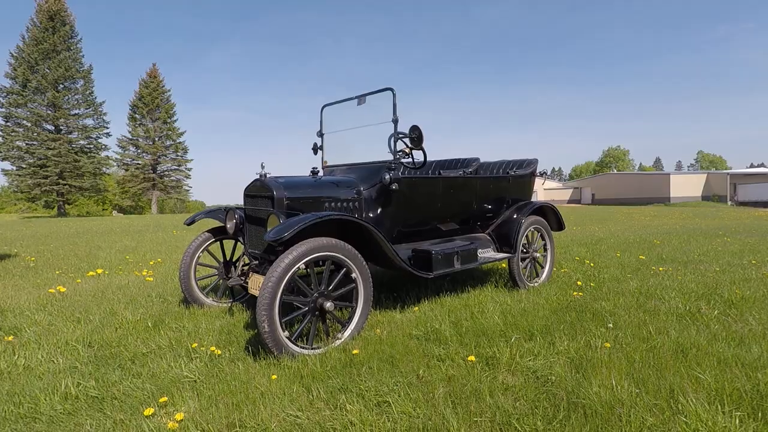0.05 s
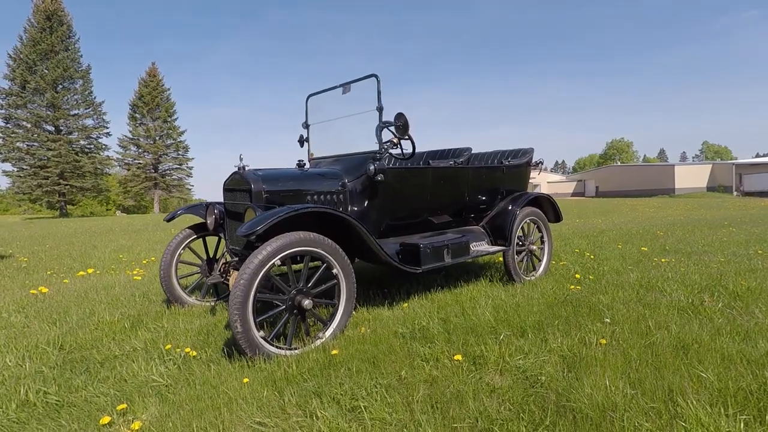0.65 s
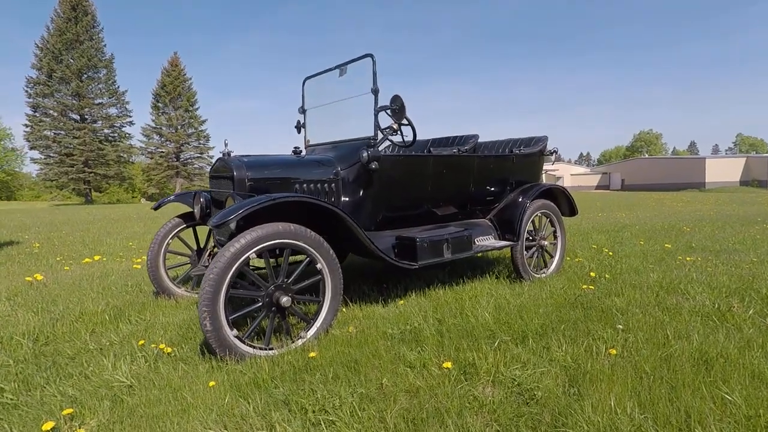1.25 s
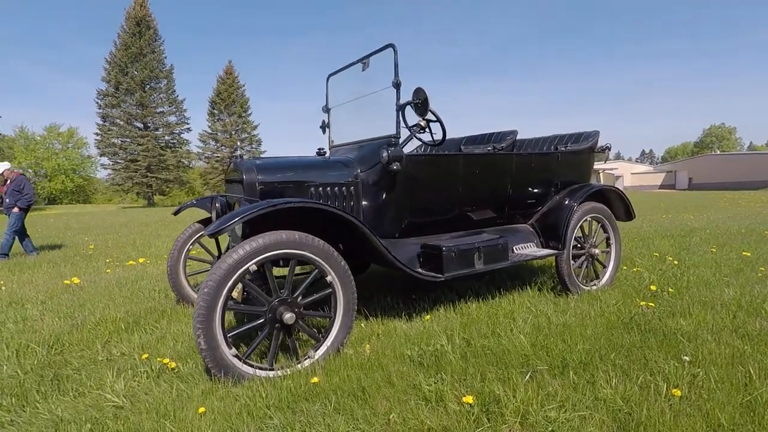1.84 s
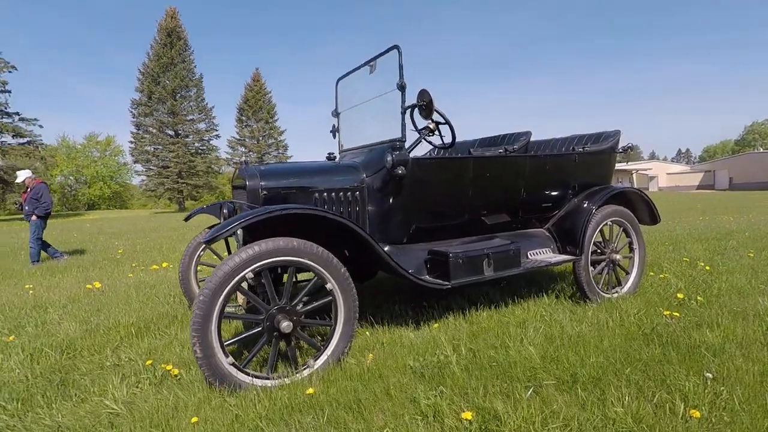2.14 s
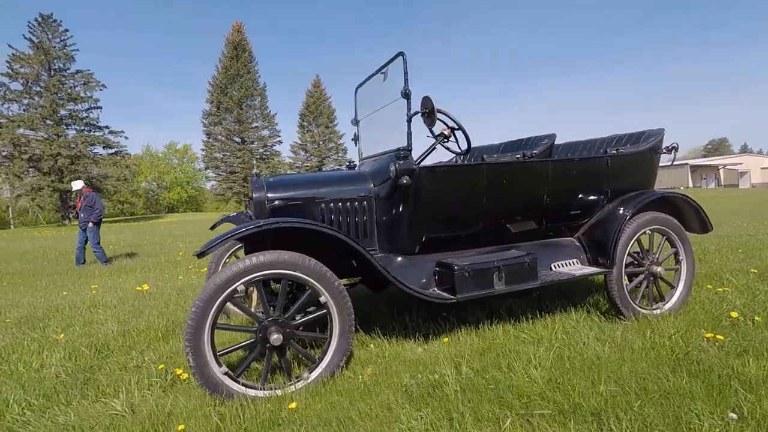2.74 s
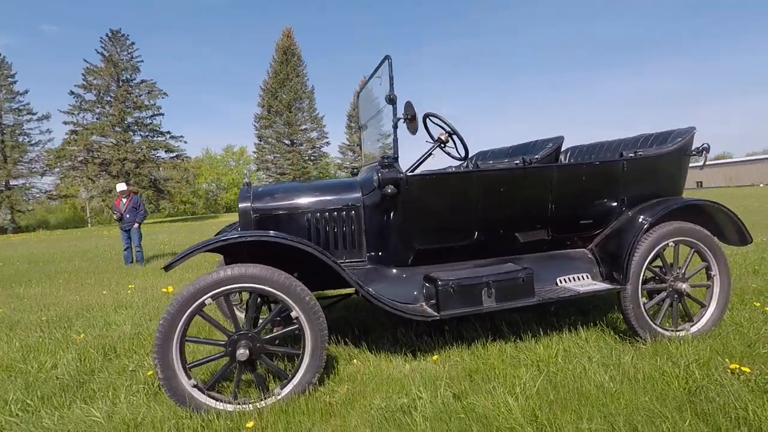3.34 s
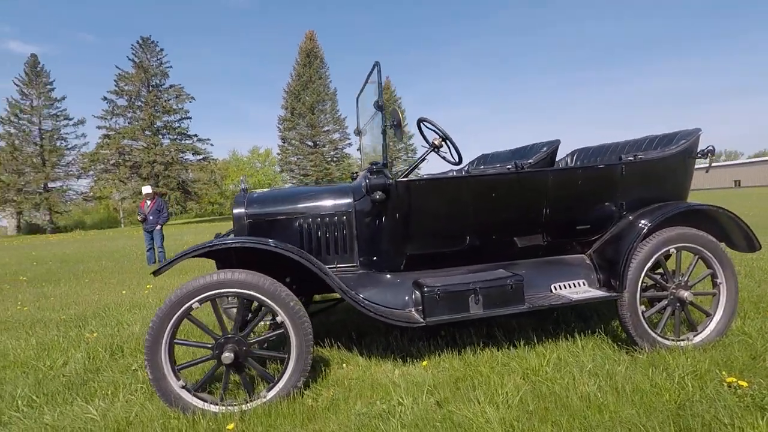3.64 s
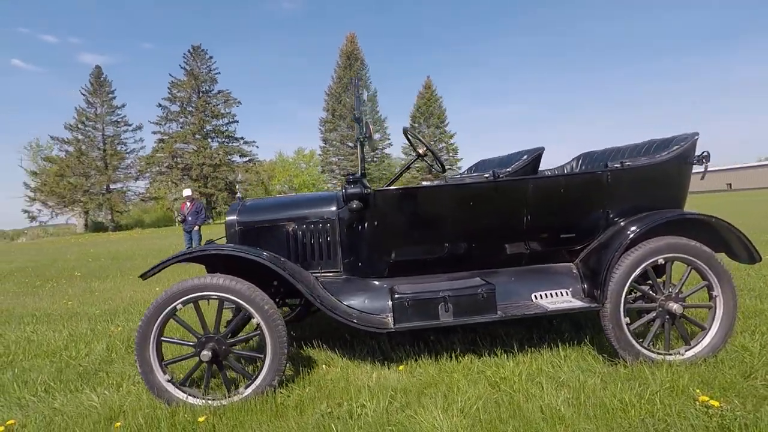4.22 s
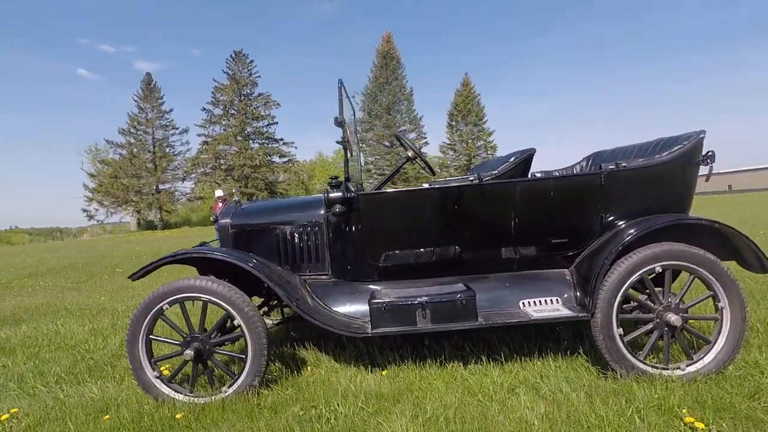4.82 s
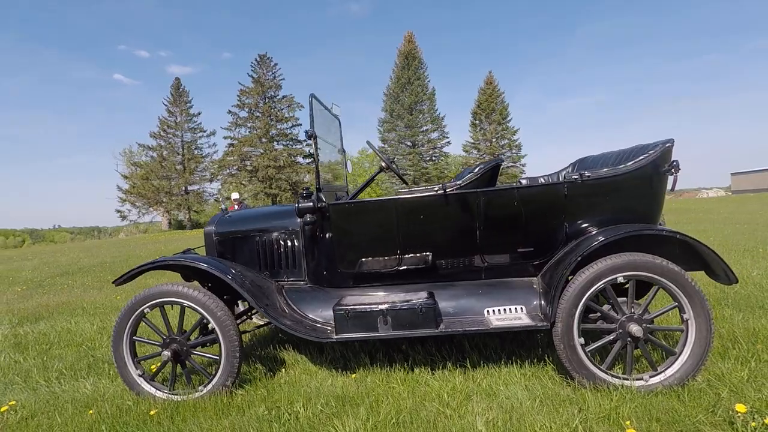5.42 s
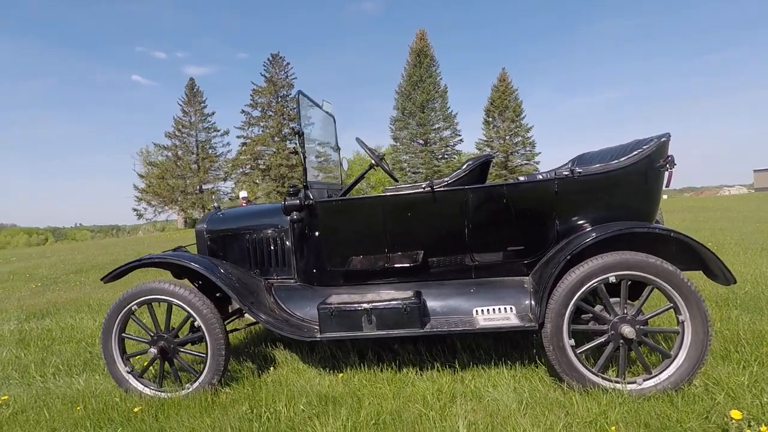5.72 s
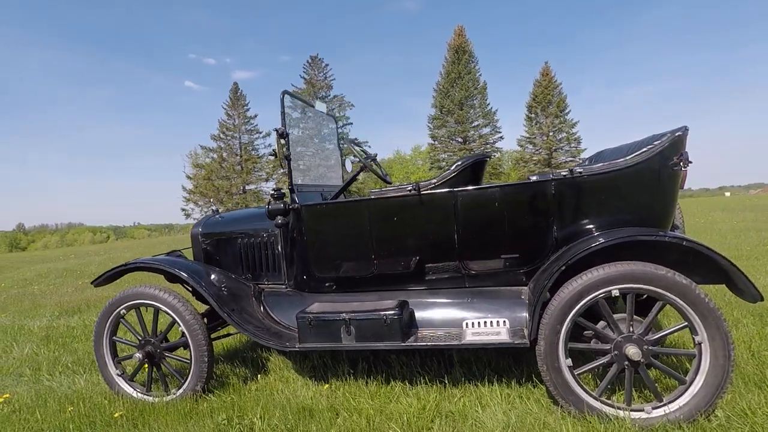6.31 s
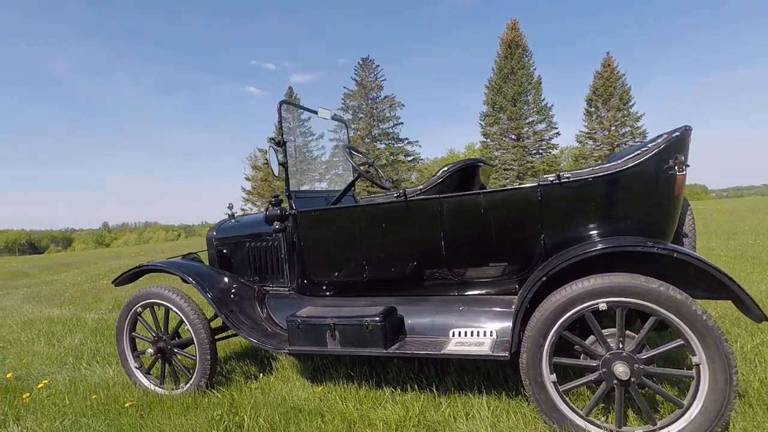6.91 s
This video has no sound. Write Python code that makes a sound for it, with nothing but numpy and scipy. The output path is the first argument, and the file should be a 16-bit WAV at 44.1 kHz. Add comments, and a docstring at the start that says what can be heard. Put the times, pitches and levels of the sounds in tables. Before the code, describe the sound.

Fast, deep chugging from an old four-cylinder car engine fades in and keeps going as the car stands outdoors. Over the throb come drumming body panels, chattering valves, light metal knocks and a buzzing tick with every pulse, along with a thin hiss. Heard from about three metres by a microphone carried around the car, the sound is clearest as it passes the hood, and the idle slows very slightly.

```python
"""Antique car idling on grass

A four-cylinder car in the open, about 3 m off, the microphone carried from its nose to its side.
The uneven exhaust chugs about 25 times a second and shakes the body; iron parts clatter and knock.
With every firing a burst of fizzing ticks, probably the ignition coils, comes from under the hood."""
import sys
import numpy as np
from scipy import signal
from scipy.fft import rfft, irfft
from scipy.io import wavfile

SR = 44100
rng = np.random.default_rng(int(sys.argv[2]) if len(sys.argv) > 2 else 0)


def dump(signal):
    """Clip the signal to [-1, 1] and save it as 16-bit WAV at the path in sys.argv[1]."""
    limited = np.clip(np.atleast_2d(signal).T, -1, 1)
    pcm = np.round(limited * 32767).astype(np.int16)
    wavfile.write(sys.argv[1], SR, pcm)


N = 311346
T = np.arange(N) / SR
IDLE_HZ, EXCESS_HZ, SETTLE_S = 23.93, 2.07, 7.3  # the firing rate starts fast and eases towards idle

# microphone's walk, 0 at the nose to 1 at the side: time_s, position
WALK = [(1.2, 0), (5.6, 1)]
# microphone closing in on the hood, then circling it: time_s, distance_m
HOOD_DISTANCE = [(0, 3.74), (2.1, 2.84), (4.6, 3), (7, 2.84)]
# the engine is most direct as the microphone passes the hood louvres: time_s, openness (0 to 1)
LOUVRES = [(0, 0), (3.7, 0.99), (7.06, 0.14)]
# the hood's sounds fall behind the chug as the tailpipe comes closer: time_s, lag_firings
HOOD_LAG = [(1, -.03), (3.5, .01), (7, .13)]
# throb of the rocking car: harmonic, crest_firings, nose_db, side_db
ROCKING = [(1, 0, -23.5, -18.9), (2, .24, -31.2, -24.2), (3, .12, -22.6, -25.4), (4, .12, -55, -36)]
# one exhaust puff per cylinder, unevenly spaced, the last one weak: place_firings, level_db
CYLINDERS = [(-.07, 4.2), (1.37, 3.9), (2.22, 7.2), (2.97, -7.4)]
# exhaust pipe resonances: pitch_hz, width_hz, nose_db, side_db
PIPE_MODES = [(72.8, 4.76, -39.5, -38.5), (113, 5, -65, -45), (125.9, 5.4, -43.5, -47),
              (142.8, 40.5, -52, -54.5)]
# spectrum of the turbulent gas: frequency_hz, level_db
RUMBLE_SPECTRUM = [(4, 8), (12, -31), (30, 5.5), (65, 5.5), (130, 6), (180, -7.5), (300, -24.5), (600, -54)]
# spectrum of the drumming body: frequency_hz, level_db
BODY_SPECTRUM = [(60, -34.5), (150, -6), (200, -3.5), (280, 1), (370, -5), (450, -5), (500, -11),
                 (560, -34), (700, -36.5)]
# ringing body panels: pitch_hz, t60_s, nose_db, side_db
PANEL_MODES = [(224.5, 0.08, -15.5, -20.5), (269.4, 0.25, -6, -11.5), (354.7, 0.063, -20.5, -16),
               (445.3, 0.12, -13, -21.5)]
# the body's hum, dropping away at the side: time_s, level_db
HUM_LEVEL = [(4.5, -5), (6, -20)]
# strength of the mechanical noise at each cylinder's firing: fizz_db, clatter_db
ACCENTS = [(1.5, 0.5), (2.5, 2.5), (3.1, 0), (1, 2.5)]
# spectrum of the gears and valves: frequency_hz, level_db
CLATTER_SPECTRUM = [(400, -17.5), (575, -21.5), (660, 0), (830, 3.5), (950, -2.5), (1090, -20),
                    (1220, -4.5), (1420, 0), (1780, 1), (1950, -3.5), (2250, -2), (2620, -6.5), (2900, -35),
                    (4000, -37.5)]
# mechanical knocks in each cycle: place_firings, pitch_hz, nose_db, side_db
KNOCKS = [(0.84, 797, -25, -16), (0.96, 750, -12, -26), (2, 670, -28, -23.5), (0.89, 1450, -23, -25),
          (1.4, 1900, -33, -38)]
# ringing block and hood: pitch_hz, t60_s, nose_db, side_db
IRON_MODES = [(620, .05, -14, -13.5), (748.5, 0.14, -15, -22.5), (846, 0.055, -35, -21),
              (1252, 0.045, -20.5, -17.5), (1434, 0.048, -34, -15), (1556, 0.021, -30, -8),
              (1772, 0.15, -17, -15), (2140, 0.0045, -14, -8)]
# spectrum of a burst of ticks: frequency_hz, level_db
FIZZ_SPECTRUM = [(2000, -1), (2500, 3.5), (2880, -10), (3220, 5.5), (3550, -7.5), (3900, 1), (4600, -5.5),
                 (5300, 4), (6400, 5), (7300, -1.5), (8600, -4), (9500, -24), (11500, -19.5), (15000, -45)]
# ringing of the ticking contact: pitch_hz, t60_s, level_db
CONTACT_MODES = [(3180, 0.0065, -11.5), (4500, 0.031, -10.5), (5300, 0.0054, -8.5), (5930, 0.049, -13.5),
                 (6300, 0.024, -10.5), (6600, 0.036, -10.5), (8720, 0.0095, -16)]
# spectrum of the mechanical hiss: frequency_hz, level_db
HISS_SPECTRUM = [(2000, -5.5), (2880, -6), (3220, 1), (3520, -5), (3850, 3.5), (4250, -0.5), (4580, 4.5),
                 (5000, -1), (6500, -1), (7700, -4.5), (8700, -5), (10200, -9.5), (11500, -17.5),
                 (15000, -24.5)]
# spectrum of a tick's bright onset: frequency_hz, level_db
SNAP_SPECTRUM = [(5000, -11), (9000, -2), (12000, -4), (15000, -18)]


def amp(db):
    """Decibels to gain."""
    return np.exp(np.asarray(db) * (np.log(10) / 20))


def unit_rms(x):
    """Scales to unit level."""
    return x / np.sqrt(np.mean(x ** 2) + 1e-20)


def curve(rows):
    """A table's points joined by straight lines in time."""
    return np.interp(T, *np.transpose(rows))


def wander(hz, size=8192):
    """Random drift of unit level, mostly slower than hz."""
    t = np.linspace(0, T[-1], size)
    f = np.fft.rfftfreq(size, t[1])
    drift = irfft(rfft(rng.standard_normal(size)) * np.exp(-(f / hz) ** 2), size)
    return np.interp(T, t, unit_rms(drift))


def colour(x, spectrum, size=16384):
    """Minimum-phase filter with the given spectrum; the result has unit level."""
    hz, db = np.transpose(spectrum)
    f = abs(np.fft.fftfreq(size, 1 / SR))
    rolloff_db = 28 * np.log10(np.maximum(f / hz[-1], 1))
    log_gain = np.log(amp(np.interp(np.log(f + 1), np.log(hz + 1), db) - rolloff_db))
    impulse = np.fft.ifft(np.exp(np.conj(signal.hilbert(log_gain)))).real[:size // 2]
    return unit_rms(signal.oaconvolve(x, impulse)[:N])


def clicks(turns):
    """A click each time the count of turns passes a whole number."""
    return np.r_[0, np.diff(np.floor(turns)) > 0].astype(float)


def facing(walk, nose_db, side_db):
    """Gain of a part as the microphone goes from nose to side."""
    return amp(nose_db + walk * (side_db - nose_db))


def ring(hits, hz, t60):
    """Each hit sets one decaying mode going; the result has unit level."""
    radius, angle = np.exp(-np.log(1000) / (t60 * SR)), 2 * np.pi * hz / SR
    return unit_rms(signal.lfilter([0, 1], [1, -2 * radius * np.cos(angle), radius ** 2], hits + 1e-18))


def radiate(hits, modes, walk):
    """Modes that beam forwards or sideways, so their balance turns with the walk."""
    return sum(ring(hits, hz, t60) * facing(walk, nose, side) for hz, t60, nose, side in modes)


def stroke(crank, opens, length, edge, fall, accent_column):
    """A gate that opens once a firing, as strong as that cylinder makes it; times in firings."""
    turn = crank - opens
    age = turn % 1
    cylinder = np.floor(turn).astype(int) % len(ACCENTS)
    strength = amp(np.array(ACCENTS)[cylinder, accent_column])
    return strength * (1 - np.exp(-age / edge)) * np.exp(-(np.maximum(age - length, 0) / fall) ** 2)


def rattle(crank, count, uneven_db):
    """Loose parts, each struck at its own place in every cycle, never quite equally hard."""
    cycle = np.mod(crank, len(CYLINDERS)) / len(CYLINDERS)
    part = np.searchsorted((np.arange(count) + rng.random(count)) / count, cycle) % count
    size = rng.choice([-1, 1], count) * rng.uniform(0.26, 1, count)
    struck = np.r_[0, np.diff(part) != 0]
    return unit_rms(struck * size[part] * amp(uneven_db * rng.standard_normal(N)))


def rocking(crank, walk):
    """The pistons shake the whole car once a firing: a deep throb with a few overtones."""
    return sum(facing(walk, nose_db, side_db) * np.cos(2 * np.pi * harmonic * (crank - crest))
               for harmonic, crest, nose_db, side_db in ROCKING)


def exhaust(crank, walk, muffler_hz=224):
    """Four unequal puffs ring the pipe and are rounded by the muffler, over a rumble of turbulent gas."""
    crank = crank + 0.004 * wander(2.7)
    puffs = sum(amp(db) * clicks((crank - place) / len(CYLINDERS)) for place, db in CYLINDERS)
    puffs *= 2 * SR / IDLE_HZ * amp(3.7 * curve(LOUVRES) + .5 * wander(22))
    chug = np.zeros(N)
    for k, (hz, width, nose_db, side_db) in enumerate(PIPE_MODES):
        mode = signal.lfilter(*signal.iirpeak(hz, hz / width, SR), puffs)
        chug += (-1) ** k * mode * facing(walk, nose_db, side_db)  # neighbours swing in opposite senses
    chug = signal.sosfiltfilt(signal.butter(4, muffler_hz, fs=SR, output="sos"), chug, padtype=None)
    turbulence = colour(rng.standard_normal(N), RUMBLE_SPECTRUM)
    return chug + turbulence * amp(-30.5 + 2.9 * curve(LOUVRES))


def body(crank, walk):
    """Shaking panels drum nearly the same pattern every cycle and hum at eight times the firing rate."""
    drumming = rattle(crank + .004 * wander(4), count=40, uneven_db=3.5)
    blows = colour(drumming + amp(-1) * rng.standard_normal(N), BODY_SPECTRUM)
    panels = amp(-1.5) * blows + radiate(blows, PANEL_MODES, walk)
    hum = np.cos(2 * np.pi * 8 * crank) * amp(curve(HUM_LEVEL) + 2 * wander(3.3))
    return (panels + hum) * facing(walk, nose_db=-37.5, side_db=-36.5) * amp(0.75 * curve(LOUVRES))


def clatter(crank, walk):
    """Gears and valves chatter in the iron block, a little harder at each firing, among ringing knocks."""
    swell = 1.36 + 0.26 * stroke(crank, opens=-0.47, length=0.49, edge=0.05, fall=0.22, accent_column=1)
    noise = rng.standard_normal(N)
    chatter = amp(-5.5) * rattle(crank + .01 * wander(10), count=70, uneven_db=3.0)
    blows = colour((noise + chatter) * swell * amp(0.74 * wander(21)), CLATTER_SPECTRUM)
    knocks = np.zeros(N)
    for place, hz, nose_db, side_db in KNOCKS:
        hits = clicks((crank - place + 0.0357 * wander(8.4)) / len(CYLINDERS)) * amp(1.5 * wander(16))
        knocks += facing(walk, nose_db, side_db) * ring(hits, hz, t60=0.068)
    iron = amp(-1) * blows + amp(-1.5) * radiate(blows, IRON_MODES, walk) + knocks
    return iron * facing(walk, nose_db=-40, side_db=-42)


def fizz(crank, walk, tick_hz=240):
    """A buzzing contact ticks for half of each firing, over a steady mechanical hiss."""
    gate = stroke(crank, opens=-0.383, length=0.31, edge=0.012, fall=0.18, accent_column=0)
    ticks = clicks(np.cumsum(tick_hz * amp(1.8 * wander(90))) / SR)
    ticks *= amp(rng.uniform(-4.5, 3.7, N)) * gate
    # each tick scatters between the hood and the block for a few milliseconds
    energy = signal.oaconvolve(ticks ** 2, np.exp(-T[:SR // 25] / 0.0056))[:N]
    scatter = unit_rms(np.sqrt(np.abs(energy))) * rng.standard_normal(N)
    burst = colour(scatter + amp(-18) * unit_rms(ticks), FIZZ_SPECTRUM)
    burst *= amp(-4 + 1.4 * curve(LOUVRES))
    pings = sum(amp(db) * ring(ticks * rng.uniform(-1.24, 1, N), hz, t60)
                for hz, t60, db in CONTACT_MODES)
    pings *= facing(walk, nose_db=-11, side_db=-8) * amp(4.4 * curve(LOUVRES))
    hiss = colour(rng.standard_normal(N) * amp(0.77 * wander(60)), HISS_SPECTRUM)
    # the hardest ticks start with a bright snap
    snap_envelope = signal.oaconvolve(ticks * rng.random(N), np.exp(-T[:SR // 50] / 0.0019))[:N]
    snap = colour(snap_envelope * rng.standard_normal(N), SNAP_SPECTRUM)
    snap *= facing(walk, nose_db=-27.5, side_db=-21.5)
    buzz = (burst + pings + snap) * amp(0.47 * wander(13))
    return (buzz + amp(-3.5) * hiss) * amp(-44)


def scene():
    """The car at one moving microphone; body and hood sounds fall off with distance."""
    firing_hz = IDLE_HZ + EXCESS_HZ * np.exp(-T / SETTLE_S)
    crank = np.cumsum(firing_hz) / SR  # counted in firings
    hood_crank = crank - curve(HOOD_LAG)
    walk, distance_m = curve(WALK), curve(HOOD_DISTANCE)
    nearness = np.mean(distance_m) / distance_m
    front = body(crank, walk) + clatter(hood_crank, walk) + fizz(hood_crank, walk)
    car = rocking(crank, walk) + exhaust(crank, walk) + nearness * front
    return car[None]


def record(dry):
    """The sound cuts in part way up a fade that opens the top treble last; then the band limit."""
    start_s, cut_s, fade_in_s, fade_out_s = .088, .003, .85, .004
    dull_hz, band_limit_hz = 7500, 15200
    fade = np.sin(np.pi / 2 * np.minimum(T / fade_in_s, 1)) * np.clip((T - start_s) / cut_s, 0, 1)
    dry = dry * np.minimum((T[-1] - T) / fade_out_s, 1)
    dull = signal.oaconvolve(dry, signal.firwin(21, dull_hz, fs=SR)[None], "same")
    faded = fade * (dull + fade ** 2 * (dry - dull))
    lowpass = signal.firwin(511, band_limit_hz, window=("kaiser", 9), fs=SR)
    return signal.oaconvolve(faded, lowpass[None], "same")


dry = scene()
out = record(dry)
dump(out)
```